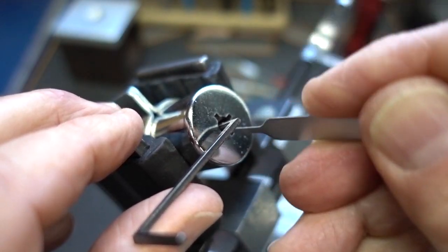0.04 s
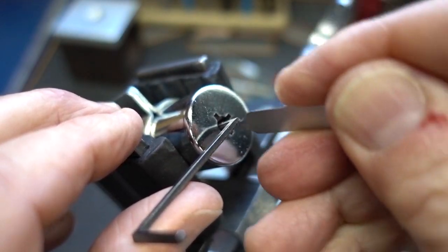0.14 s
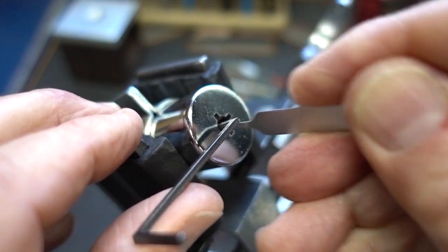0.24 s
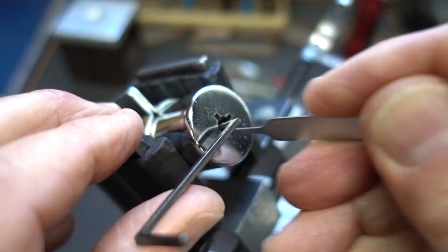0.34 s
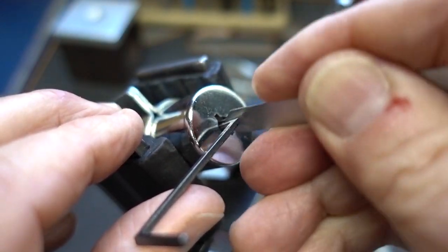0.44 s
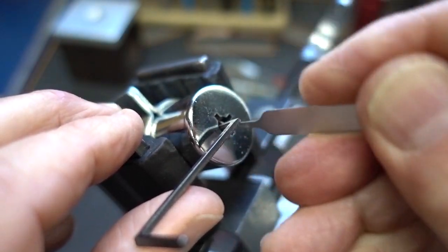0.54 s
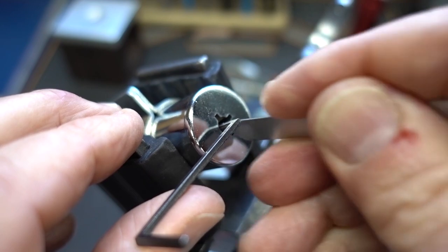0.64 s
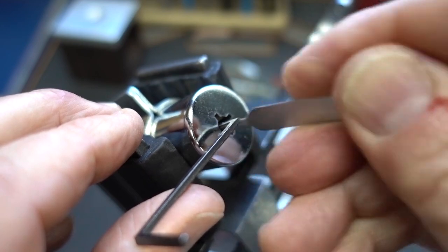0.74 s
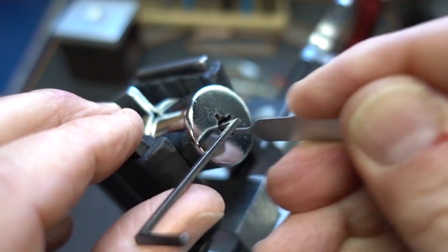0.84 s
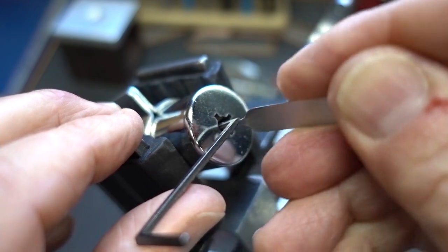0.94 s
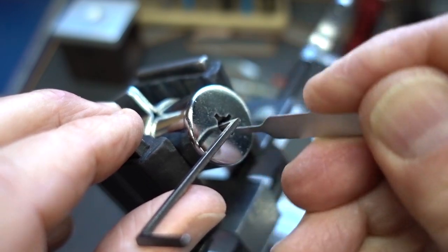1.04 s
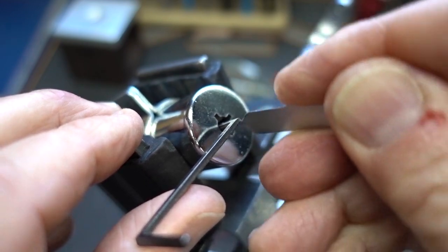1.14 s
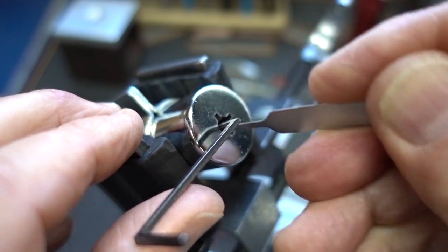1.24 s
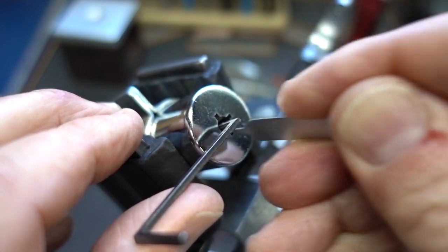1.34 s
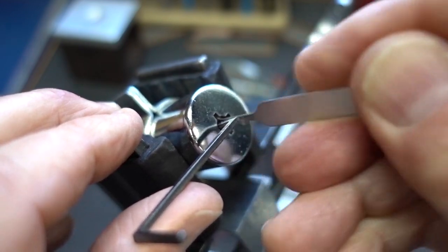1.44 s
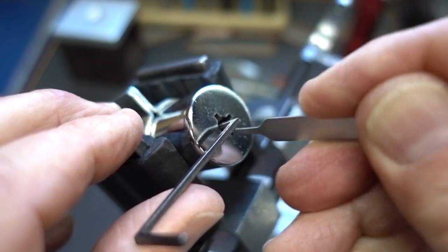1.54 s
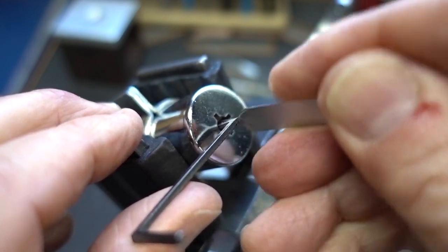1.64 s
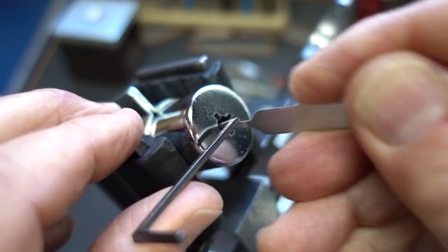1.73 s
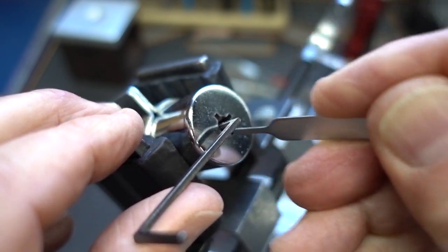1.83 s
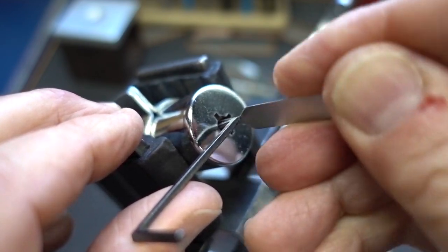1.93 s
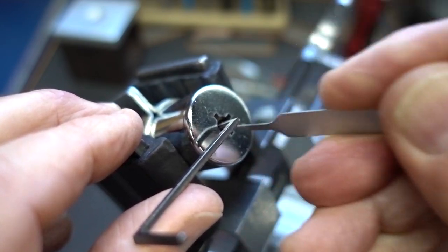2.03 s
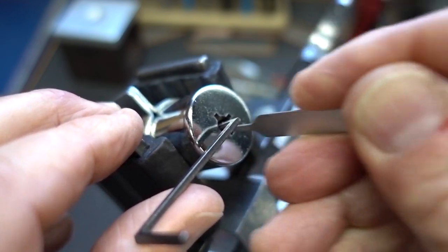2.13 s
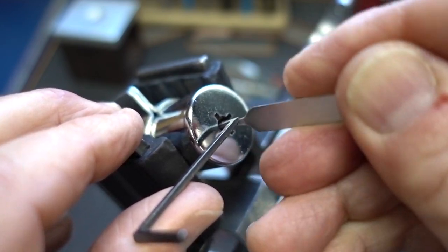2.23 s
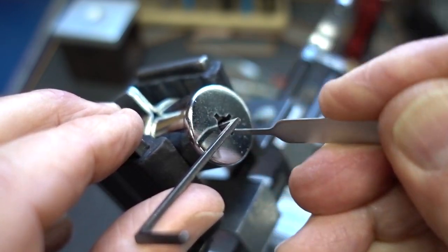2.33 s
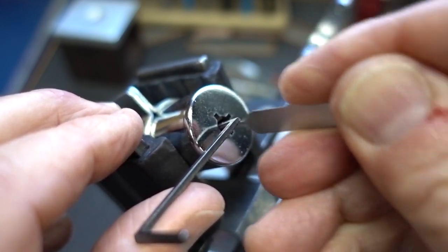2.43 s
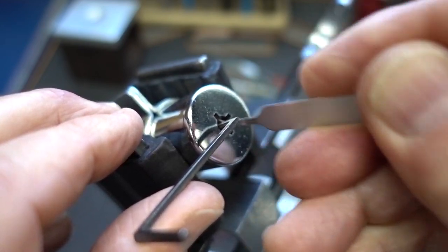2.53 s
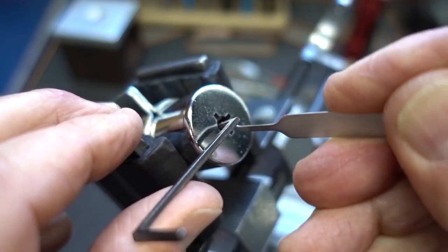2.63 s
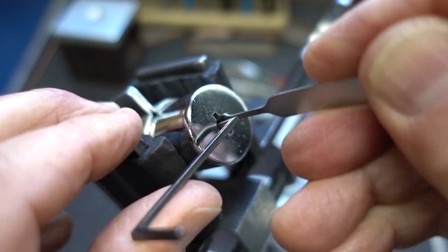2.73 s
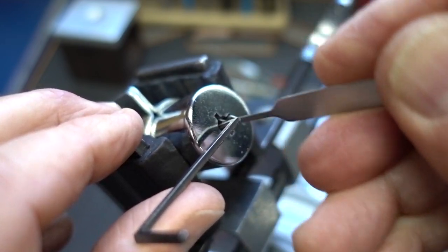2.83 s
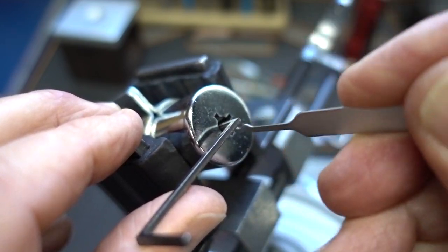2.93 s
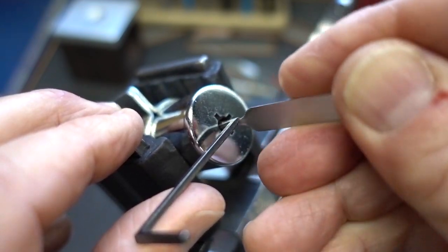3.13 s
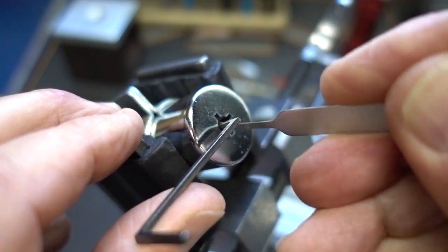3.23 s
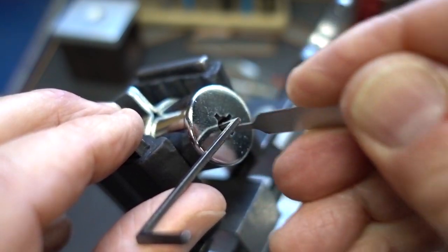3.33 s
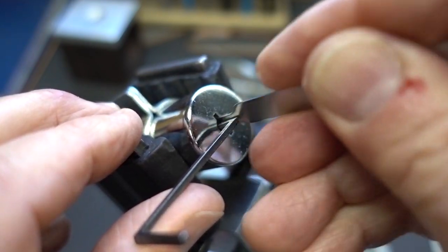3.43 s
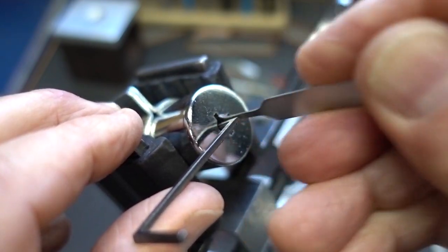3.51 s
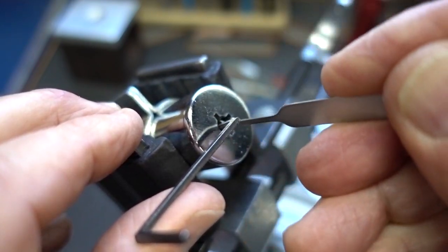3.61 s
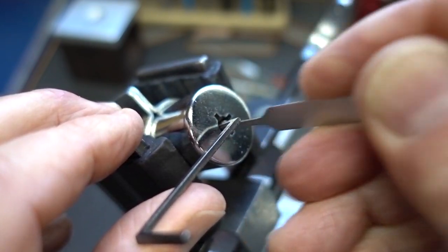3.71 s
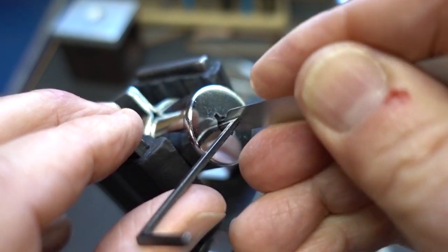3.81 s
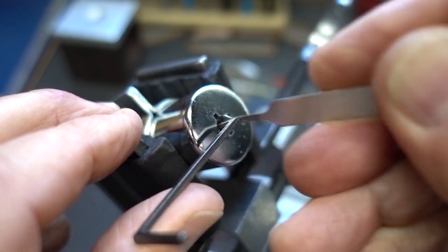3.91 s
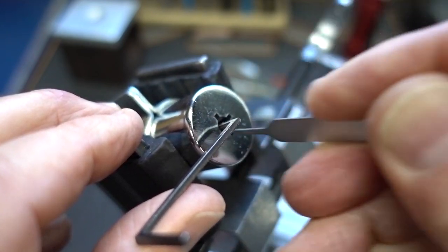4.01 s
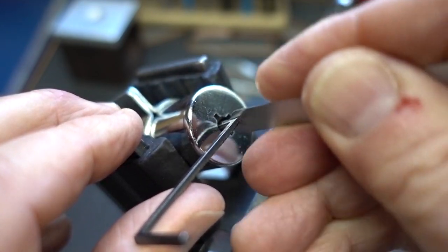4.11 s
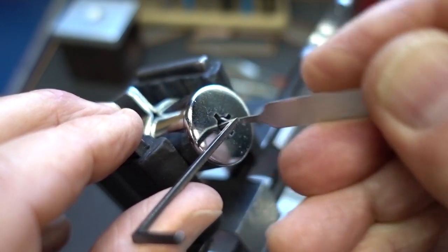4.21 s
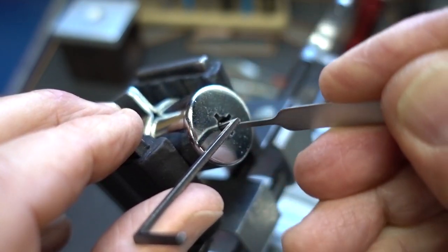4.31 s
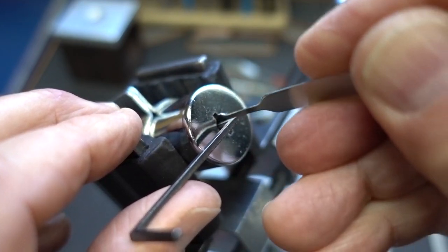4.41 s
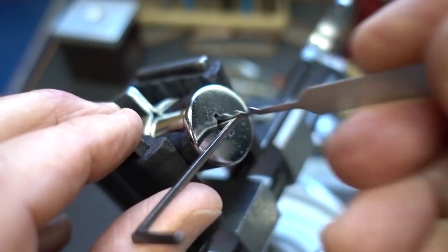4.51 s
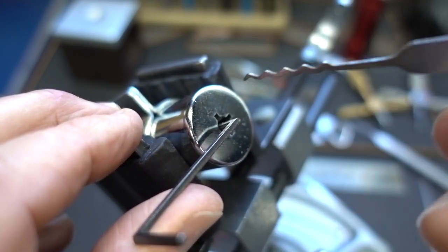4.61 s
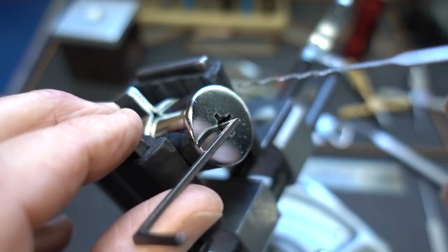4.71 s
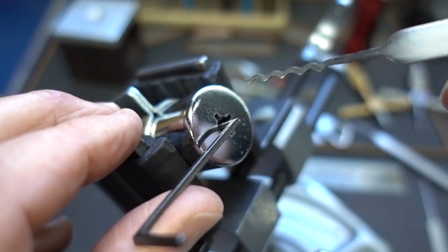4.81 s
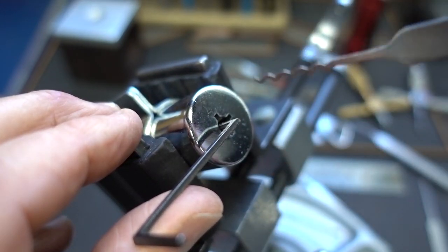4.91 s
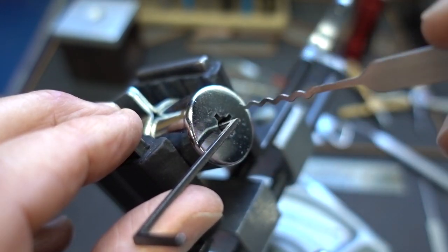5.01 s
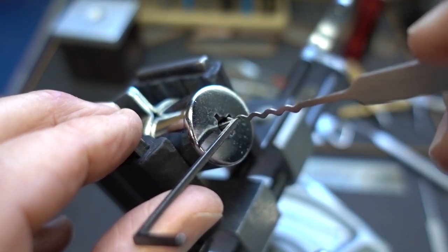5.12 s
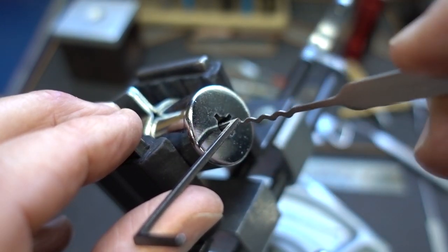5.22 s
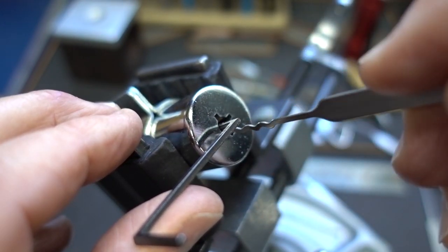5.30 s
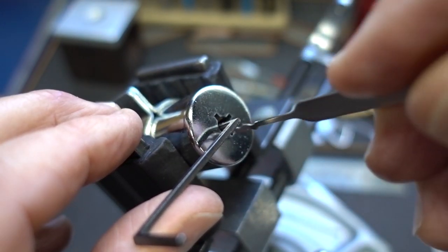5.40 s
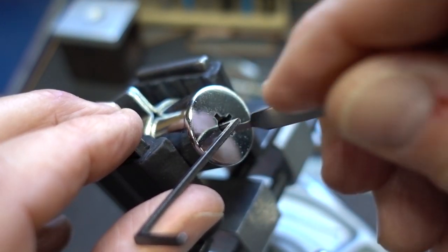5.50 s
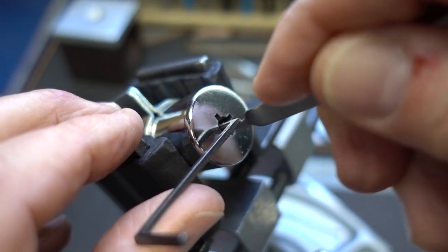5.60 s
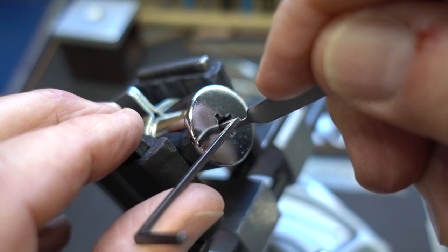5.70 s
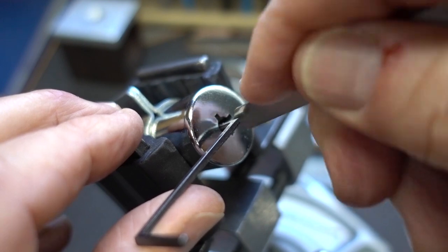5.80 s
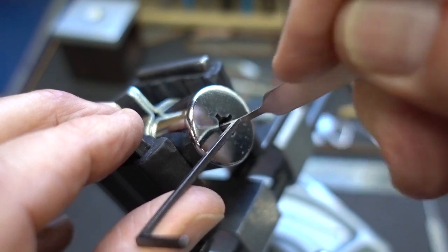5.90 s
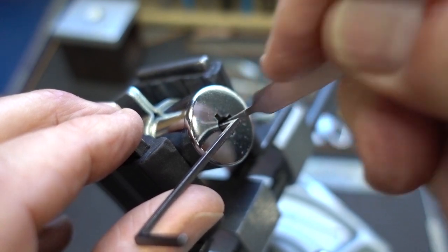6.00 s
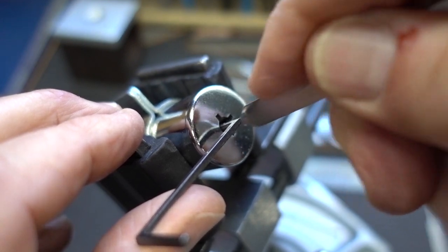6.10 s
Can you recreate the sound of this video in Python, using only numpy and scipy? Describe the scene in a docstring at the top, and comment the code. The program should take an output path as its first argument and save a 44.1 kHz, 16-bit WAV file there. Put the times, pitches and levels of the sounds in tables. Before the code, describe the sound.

A thin steel rake scrubs rapidly inside a lock, pins snapping in bright scratchy clicks, pausing briefly, then starting again in a quiet room.

```python
"""Pins snap in a lock held in a vise as a wavy steel rake is scrubbed in and out, close by in a small room.
Each snap is a sharp crack, a ping and a dying chatter that ring the steel and the lock body.
The blade scrapes in tiny slips of noise; pushes, recoils and bumps ring the lock, vise and bench.
The rake is pulled out, pauses while fingers rustle, ticks at the keyhole and starts again over a quiet room."""
import sys
import numpy as np
from scipy import signal
from scipy.fft import rfft, irfft, next_fast_len
from scipy.io import wavfile

SR = 44100
rng = np.random.default_rng(int(sys.argv[2]) if len(sys.argv) > 2 else 0)


def file_out(sig):
    """Save sig as 16-bit WAV at sys.argv[1]."""
    # one column per channel
    cols = np.atleast_2d(sig).T
    # limit, then scale
    lim = np.clip(cols, -1, 1)
    pcm = np.round(lim * 32767).astype(np.int16)
    wavfile.write(sys.argv[1], SR, pcm)


N = 271215

# pins that catch on a tooth and snap free, standing out of the rattle:
# start_s [s], level_db [dB, relative], brightness_db [dB]
PIN_SNAPS = [(0.041, -30.5, -4.5), (0.181, -32.5, -15), (0.299, -27.5, -1), (0.403, -28, 11),
             (0.419, -24, -6.5), (0.549, -17, -2.5), (0.573, -19, -3.5), (0.657, -23.5, 7.5),
             (0.778, -27, 3), (0.788, -22, 0), (0.899, -26, 5), (1.028, -18.5, 0), (1.072, -25.5, 7.5),
             (1.139, -31, -11.5), (1.255, -19.5, 7), (1.27, -26.5, -8.5), (1.322, -32.5, -6),
             (1.387, -24.5, -17), (1.453, -22, 9.5), (1.492, -18, 1), (1.583, -27, 19), (1.698, -20, 0),
             (1.828, -34.5, 0.5), (1.92, -30, 2.5), (1.965, -22, -3.5), (2.074, -28, 19), (2.236, -19, -3),
             (2.544, -19, -1), (2.579, -18, -1.5), (2.609, -19.5, -0.5), (2.906, -32.5, 10),
             (2.928, -34.5, -2), (3.065, -29.5, 1), (3.133, -29.5, -11), (3.193, -23.5, 6),
             (3.257, -22.5, -1), (3.314, -28.5, 26.5), (3.439, -28.5, 3), (3.475, -22, 2), (3.54, -21, -9),
             (3.572, -23.5, -2), (3.904, -21, -5), (3.962, -23.5, -13), (4.094, -27.5, 34),
             (4.184, -22, 8.5), (4.215, -19, -9.5), (4.28, -29, -2), (4.561, -22, 7.5), (4.567, -20, 10),
             (4.585, -18.5, -1), (5.5, -41, 5), (5.557, -25, 3), (5.769, -24, 37), (5.841, -24.5, -6),
             (5.92, -22, -6), (5.944, -23, -17)]
# short pushes and pulls of the rake across the pins:
# start_s [s], length_s [s], pin_level_db [dB, relative], lock_jolt_db [dB, relative]
RAKE_PUSHES = [(0.041, 0.034, -32, -34.5), (0.192, 0.011, -52, -44.5), (0.283, 0.045, -35, -30),
               (0.396, 0.032, -29, -43), (0.461, 0.01, -43.5, -34), (0.544, 0.036, -28.5, -39.5),
               (0.657, 0.018, -31, -29), (0.779, 0.045, -28.5, -27.5), (0.888, 0.021, -32.5, -37.5),
               (0.973, 0.012, -30.5, -29.5), (1.107, .033, -37, -37.5), (1.255, .016, -24.5, -24.5),
               (1.371, 0.023, -30, -42.5), (1.452, .018, -32, -24.5), (1.488, 0.0094, -32.5, -29),
               (1.595, 0.049, -33.5, -39.5), (1.774, 0.021, -31.5, -33.5), (1.886, 0.047, -36, -31),
               (2.036, .048, -26, -30.5), (2.162, 0.039, -28, -39), (2.309, 0.012, -26, -33),
               (2.453, 0.03, -32, -33), (2.574, .035, -36, -37.5), (2.646, 0.01, -35, -34.5),
               (2.722, 0.031, -37.5, -31), (3.033, 0.055, -28, -32.5), (3.131, 0.021, -34, -34.5),
               (3.2, 0.029, -29, -28.5), (3.252, 0.0088, -30, -39), (3.381, 0.044, -45.5, -68.5),
               (3.475, 0.012, -30, -30.5), (3.518, .028, -32.5, -28), (3.562, 0.023, -28, -33),
               (3.743, 0.041, -35.5, -36), (3.813, 0.0082, -41, -49), (3.908, .032, -25.5, -23.5),
               (3.96, 0.015, -28, -35), (4.041, 0.068, -36, -37.5), (4.183, 0.035, -38, -28),
               (4.278, 0.02, -33.5, -38), (4.416, 0.0088, -35, -36.5), (4.496, .022, -39, -37),
               (4.534, .062, -25, -31.5), (5.358, 0.0054, -60, -47), (5.527, 0.045, -32.5, -36),
               (5.647, .023, -31, -35.5), (5.81, 0.029, -34, -40), (5.896, 0.059, -29, -36.5),
               (6.043, 0.055, -26, -28.5)]
PIN_BRIGHT_DB, BRIGHT_SCATTER_DB = 0.5, 10.5  # mean brightness of passing and loose pins, and its spread


def amp(db):
    """Turn decibels into a gain."""
    return 10 ** (np.asarray(db) / 20)


def unit(x):
    """Scale a sound to rms 1."""
    return x / np.sqrt(np.mean(x ** 2) + 1e-20)


def along(points, hz):
    """Read a curve of (Hz, value) points on a logarithmic frequency axis."""
    f, value = np.transpose(points)
    return np.interp(np.log(hz + 1), np.log(f), value)


def levels(rows):
    """Turn each dB column after the time into one gain per sample."""
    s, *columns = np.transpose(rows)
    return [amp(np.interp(np.arange(N) / SR, s, db)) for db in columns]


def add(track, s, sound):
    """Mix a sound into a track at time s."""
    start = max(round(s * SR), 0)
    track[start:start + len(sound)] += sound[:max(len(track) - start, 0)]


def filtered(x, response):
    """Multiply the spectrum of x by a response that depends on frequency."""
    size = next_fast_len(N + SR // 2)  # room for the ringing at the end
    return irfft(rfft(x, size) * response(np.fft.rfftfreq(size, 1 / SR)), size)[:N]


def coloured(x, spectrum, size=4096):
    """Give x a spectrum with a filter of unit energy that never rings ahead of the sound."""
    # folding the cepstrum forward in time gives the filter its minimum phase
    cepstrum = irfft(np.log(amp(along(spectrum, np.fft.rfftfreq(size, 1 / SR)))))
    cepstrum[1:size // 2] *= 2
    cepstrum[size // 2 + 1:] = 0
    response = irfft(np.exp(rfft(cepstrum)))
    return signal.fftconvolve(x, response / np.linalg.norm(response))[:N]


def resonances(x, peaks):
    """Let a body with (Hz, width Hz, dB) resonances answer a contact force."""
    def response(f):
        return sum(amp(db) * 1j * f * width / (centre ** 2 - f ** 2 + 1j * f * width)
                   for centre, width, db in peaks)
    return filtered(x, response)


def ring(modes, attack, detune, scatter_db, size=SR // 4):
    """Sum dying tones to a peak of 1; grip and point of contact change them from blow to blow."""
    t = np.arange(size) / SR
    hz, db, t60 = np.transpose(modes)[:, :, None]
    shift, gain, phase = rng.standard_normal((3, len(modes), 1))
    tones = np.sin(2 * np.pi * hz * np.exp(detune * shift) * t + 2 * np.pi * phase)
    waves = amp(db + scatter_db * gain - 60 * t / t60) * tones
    sound = waves.sum(axis=0) * (1 - np.exp(-(t / attack) ** 2))
    return sound / np.abs(sound).max()


def slips(rate, spread_db, life):
    """Stick-slip friction of rms 1: tiny dying noise bursts at random moments and of random sizes."""
    happens = rng.random(N) < rate / SR  # rate in slips per second
    sizes = amp(spread_db * np.clip(rng.standard_normal(N), -2, 2)) * happens
    power = signal.lfilter([1], [1, -np.exp(-2 / (life * SR))], sizes ** 2)
    return unit(np.sqrt(power) * rng.standard_normal(N))


def pressure(events, build, fade, lead):
    """A force that builds up to each event (s, dB, ...), by the power share lead, and fades after it."""
    load = np.zeros(N)
    for s, db, *_ in events:
        add(load, s, [amp(db) ** 2])
    after = signal.lfilter([1], [1, -np.exp(-2 / (fade * SR))], load)
    before = signal.lfilter([1], [1, -np.exp(-2 / (build * SR))], load[::-1])[::-1]
    return np.sqrt(after + lead * before)


def snaps(contacts, crack_t60=0.01, chatter_db=-17, chatter_t60=0.082, size=SR // 12):
    """Each snap is a sharp impact, a brief ping and a dying chatter; gives forces on blade and housing."""
    # ringing of the brass pins: pitch_hz [Hz], level_db [dB, relative], decay_t60_s [s]
    pin_modes = [(5910, 7.5, 0.0043), (6650, 8.5, 0.016), (7110, 5.5, 0.0067), (9140, 2, 0.0027),
                 (9720, -5.5, 0.042), (10880, 10, 0.0069), (11560, 3.5, 0.025), (12870, -15.5, 0.015),
                 (13900, 6.5, 0.0074)]
    blade, housing, t = np.zeros(N), np.zeros(N), np.arange(size) / SR
    soft = signal.firwin(15, 9000, fs=SR)
    for s, db, bright_db in contacts:
        length, impact, seat_db = rng.uniform(-1, 1, 3) * [0.5, 0.3, 2]
        crack = amp(-60 * t / (crack_t60 * np.exp(length))) * rng.standard_normal(size)
        crack[0] += 0.48 * np.exp(impact)
        chatter = amp(chatter_db - 60 * t / chatter_t60) * rng.standard_normal(size)
        blow = crack + chatter
        add(blow, 0, 1.3 * ring(pin_modes, attack=0.0001, detune=0.035, scatter_db=4, size=SR // 36))
        blow *= amp(db) / np.std(blow[:SR // 333])  # level is set by the first 3 ms
        # square contacts are brighter, glancing ones duller
        low = np.convolve(blow, soft)
        high = np.pad(blow, len(soft) // 2) - low
        tilt = amp(bright_db)
        add(blade, s, (low + tilt * high) / np.sqrt(0.7 + 0.3 * tilt ** 2))
        # a pin that is firmly seated passes more of the blow to the housing
        add(housing, s, amp(seat_db) * blow)
    return blade, housing


def rattle():
    """During a push the teeth trip one pin after another, unevenly; rows (s, level dB, brightness dB)."""
    tooth_s = 0.0105  # usual time from one pin to the next
    gap_scatter, strength_scatter_db = 0.22, 2.5  # unevenness of spacing (share of a gap) and strength
    rows = []
    for start, length, db, _ in RAKE_PUSHES:
        count = round(length / tooth_s) + 1
        shift, strength, square = np.clip(rng.standard_normal((3, count)), -1.5, 1.5)
        shift[0] = 0  # the first pin trips as the push starts
        times = np.linspace(start, start + length, count) + gap_scatter * tooth_s * shift
        bright_db = PIN_BRIGHT_DB + BRIGHT_SCATTER_DB * square
        rows += zip(times, db + strength_scatter_db * strength, bright_db)
    return rows


def strays(sliding, count=32):
    """Loose pins tick at random, as loud as the sliding allows; rows (s, level dB, brightness dB)."""
    above_scrape_db, spread_db = 4.5, 4
    when = rng.integers(0, N, count)
    strength, square = rng.standard_normal((2, count))
    db = 20 * np.log10(sliding[when]) + above_scrape_db + spread_db * np.clip(strength, -2, 2)
    return list(zip(when / SR, db, PIN_BRIGHT_DB + BRIGHT_SCATTER_DB * square))


def steel(x):
    """Pins and blade give a contact force their bright ring."""
    # spectrum of the ring: pitch_hz [Hz], level_db [dB per Hz, relative]
    steel_spectrum = [(2500, -33.5), (4600, -44.5), (5300, -10), (6000, -2), (6700, 2.5), (7300, 3.5),
                      (8100, -1), (9400, -1.5), (11500, -4.5), (12500, -6.5), (15300, -6.5), (16000, -13)]
    return coloured(x, steel_spectrum)


def cylinder(x):
    """The lock body and tension wrench ring with a contact force."""
    # their resonances: pitch_hz [Hz], width_hz [Hz], level_db [dB, relative]
    body_peaks = [(414, 29.3, 6.5), (794, 26, -15.5), (1001, 264, -12), (1388, 9.5, -10.5),
                  (1343, 115, -10.5), (1610, 213, -13), (1798, 48.5, 3), (2113, 150, -16), (2386, 250, -28),
                  (2922, 610, -13), (3377, 100, -9), (3766, 23, -8.5)]
    return resonances(x, body_peaks)


def hand_force(lead):
    """The force of the hand swells with each push, ahead of it by the share lead, and relaxes after it."""
    middles = [(start + length / 2, jolt_db) for start, length, _, jolt_db in RAKE_PUSHES]
    return pressure(middles, build=0.058, fade=0.18, lead=lead)


def stroke():
    """Sliding and hand force set the gains of sliding alone, of the whole scrape and of the clamp's rumble."""
    # the blade in the keyway, withdrawn for the pause:
    # start_s [s], scrape_db [dB, relative], clamp_rumble_db [dB, relative]
    stroke_levels = [(0, -47.5, -53.5), (0.75, -41, -41), (1.2, -41.5, -50), (2.1, -42.5, -43.5),
                     (2.9, -48, -51.5), (3.7, -47, -55), (4.05, -37, -51.5), (4.57, -48.5, -43.5),
                     (4.66, -84, -62), (5.05, -90, -88.5), (5.24, -91.5, -87), (5.28, -66, -53),
                     (5.42, -67.5, -59), (5.6, -51.5, -49.5), (6.15, -38, -44.5)]
    engaged_db = -56  # scrape level above which the blade is fully in the lock
    hand_scrape_db, hand_rumble_db = -24.5, -19  # gains from hand force to scrape and to rumble
    sliding, rumble = levels(stroke_levels)
    engaged = np.minimum(sliding / amp(engaged_db), 1)
    # the clamp is loaded ahead of a push, but the blade scrapes only once it moves
    rumble = np.hypot(rumble, amp(hand_rumble_db) * engaged * hand_force(lead=0.5))
    scrape = np.hypot(sliding, amp(hand_scrape_db) * engaged * hand_force(lead=0))
    return sliding, scrape, rumble


def blade_friction(contacts, scrape):
    """The blade loads each pin just before it snaps, rubs on it after, and scrapes along the keyway."""
    drag = pressure(contacts, build=0.0031, fade=0.0063, lead=0.025)
    pin_rub = amp(-6) * drag * slips(rate=490, spread_db=2.5, life=0.0017)
    return pin_rub + amp(-11.5) * scrape * slips(rate=600, spread_db=14, life=0.0055)


def rocking():
    """Pushes rock the lock in its clamp and snaps make it recoil; rows (s, knock dB, thud dB)."""
    rock_s, rock_lag = 0.03, 0.3  # one rock per this much of a push, this share of the way into each part
    push_knock_db, push_thud_db, thud_growth = -3, -6, 0.93  # growth: dB of thud per dB of jolt
    recoil_knock_db, recoil_thud_db = -13, -15.5
    recoil_per_bright = -0.079  # dB per dB of brightness: bright snaps recoil less
    rows = []
    for start, length, _, jolt_db in RAKE_PUSHES:
        count = max(round(length / rock_s), 1)
        db = jolt_db - 10 * np.log10(count)  # the rocks share the power of the jolt
        for k in range(count):
            s = start + length * (k + rock_lag) / count
            rows.append((s, db + push_knock_db, thud_growth * db + push_thud_db))
    for s, db, bright_db in PIN_SNAPS:
        recoil_db = db + recoil_per_bright * bright_db
        rows.append((s, recoil_db + recoil_knock_db, recoil_db + recoil_thud_db))
    return rows


def jolts(rocks, grind_t60=0.069, grind_growth=1.13, size=SR // 8):
    """A jolt rocks the lock, thuds through the vise and grinds the plug, proportionally more when hard."""
    # the lock rocking in the jaws: pitch_hz [Hz], level_db [dB, relative], decay_t60_s [s]
    knock_modes = [(319.7, -3.5, 0.067), (412.7, 8.5, 0.057), (443, -10, 0.065)]
    # the vise and bench: pitch_hz [Hz], level_db [dB, relative], decay_t60_s [s]
    vise_modes = [(64, -5.5, 0.12), (81.8, -16, 0.63), (84.3, -2, 0.15), (126.4, 4.5, 0.094),
                  (172, -4.5, 0.088), (241.7, 1.5, 0.042)]
    body, grind, t = np.zeros(N), np.zeros(N), np.arange(size) / SR
    for s, knock_db, thud_db in rocks:
        knock = ring(knock_modes, attack=0.0074, detune=0.03, scatter_db=1.5, size=size)
        thud = ring(vise_modes, attack=0.0039, detune=0.026, scatter_db=3.5)
        add(body, s, amp(knock_db + 3.5) * knock)
        add(body, s, amp(thud_db + 3) * thud)
        add(grind, s, amp(grind_growth * knock_db - 60 * t / grind_t60) * rng.standard_normal(size))
    return body + amp(13.5) * cylinder(grind)


def bumps(bump_t60=0.063, size=SR // 8):
    """At the end of its travel the rake bumps the lock: a dull blow of noise, and the bench sways briefly."""
    # bumps against the jaws: start_s [s], bump_db [dB, relative], bench_sway_db [dB, relative]
    bump_rows = [(0.546, -26, -28.5), (0.81, -39, -32), (1.261, -26, -40), (1.463, -35.5, -33),
                 (1.501, -32.5, -26), (2.24, -38, -42), (2.585, -36.5, -31), (2.609, -28, -33.5),
                 (3.26, -37.5, -31), (3.476, -26.5, -37.5), (3.571, -29, -26), (3.865, -37, -34),
                 (3.96, -41, -29), (4.218, -26.5, -28), (4.423, -30.5, -39.5)]
    # dull spectrum of the jaws: pitch_hz [Hz], level_db [dB per Hz, relative]
    jaw_spectrum = [(40, -28.5), (120, -7), (200, -3.5), (290, -1.5), (400, -4), (520, -20.5), (750, -61),
                    (2000, -79)]
    # the bench swaying: pitch_hz [Hz], level_db [dB, relative], decay_t60_s [s]
    bench_modes = [(47, 0, 0.29)]
    force, sway, t = np.zeros(N), np.zeros(N), np.arange(size) / SR
    for s, db, sway_db in bump_rows:
        add(force, s, amp(db + 1.5 - 60 * t / bump_t60) * rng.standard_normal(size))
        add(sway, s, amp(sway_db - 4) * ring(bench_modes, attack=0.006, detune=0.07, scatter_db=0))
    return coloured(force, jaw_spectrum) + sway


def clamp_creak(rumble):
    """The loaded clamp rumbles in low-pitched slips."""
    # spectrum of the rumble: pitch_hz [Hz], level_db [dB per Hz, relative]
    rumble_spectrum = [(15, -56), (25, -36.5), (41, -1), (70, -1), (130, 3.5), (167, -3.5), (267, -4.5),
                       (358, -11.5), (406, 3.5), (448, 6), (501, -19), (545, -15), (635, -31), (700, -77),
                       (910, -30.5), (1540, -120)]
    creaks = coloured(slips(rate=150, spread_db=1.5, life=0.0019), rumble_spectrum)
    return amp(-0.5) * rumble * unit(creaks)


def taps(tick_t60=0.005, scuff_db=-15, scuff_t60=0.06, ping_db=-15, size=SR // 10):
    """Outside the lock the thin blade ticks, scuffs briefly and barely rings."""
    # the free blade touching the mouth of the keyway: start_s [s], level_db [dB, relative]
    tap_rows = [(5.164, -43), (5.219, -56.5), (5.2535, -43.5), (5.295, -53), (5.304, -40), (5.31, -47),
                (5.3806, -51), (5.455, -50.5)]
    # the blade held free: pitch_hz [Hz], level_db [dB, relative], decay_t60_s [s]
    blade_modes = [(2650, -17, 0.04), (4370, -22.5, 0.04), (5230, -18, 0.019), (6570, 3, 0.031),
                   (7230, 2, 0.019), (8570, 9, 0.015), (10300, 21, 0.039), (12000, -5, 0.02),
                   (15150, -5, .01)]
    out, t = np.zeros(N), np.arange(size) / SR
    thin = signal.butter(4, 4000, "high", fs=SR, output="sos")
    for s, db in tap_rows:
        envelope = amp(-60 * t / tick_t60) + amp(scuff_db - 60 * t / scuff_t60)
        tick = signal.sosfilt(thin, envelope * rng.standard_normal(size))
        ping = amp(ping_db) * ring(blade_modes, attack=0.0001, detune=0.03, scatter_db=3, size=size)
        add(out, s, amp(db + 9) * (tick + ping))
    return out


def entry():
    """The tip rubs softly along the keyway as it goes back in."""
    # the tip held against the keyway wall: pitch_hz [Hz], width_hz [Hz], level_db [dB, relative]
    keyway_peaks = [(1143, 40, 5), (1344, 61, 5), (1580, 50, -0.5), (2090, 67, 3), (2840, 140, 2.5),
                    (3300, 130, -4), (4200, 160, 2)]
    start_s, attack_s, hold_s = 5.255, 0.023, 0.045  # hold counts from the start
    level_db, fade_db_per_s = -69, 74
    t = np.arange(N) / SR - start_s
    fade = amp(level_db - fade_db_per_s * np.maximum(t - hold_s, 0))
    envelope = np.clip(t / attack_s, 0, 1) * fade
    rub = slips(rate=1900, spread_db=4, life=0.0023)
    # passing the resonances twice makes them sharper
    return envelope * unit(resonances(resonances(rub, keyway_peaks), keyway_peaks))


def grip():
    """Fingers shift on the steel handle during the pause: skin rustles and the vise thrums."""
    # strength of the shifting: start_s [s], level_db [dB, relative]
    grip_levels = [(4.58, -92), (4.65, -56), (4.71, -60), (4.78, -62), (4.83, -59), (4.9, -64.5),
                   (5.03, -74), (5.2, -100)]
    # skin on the handle: pitch_hz [Hz], level_db [dB per Hz, relative]
    skin_spectrum = [(300, 6), (700, -12), (1400, 2.5), (2700, 0), (4500, -11), (6700, 3), (9000, 2.5),
                     (13000, -0.5), (16000, -4.5)]
    # the vise stirred by the hand: pitch_hz [Hz], level_db [dB per Hz, relative]
    thrum_spectrum = [(25, -28.5), (55, -11), (80, 0), (105, -9), (160, -26.5), (400, -29.5), (600, -71.5)]
    rustle = unit(coloured(slips(rate=6800, spread_db=7.5, life=0.002), skin_spectrum))
    thrum = unit(coloured(rng.standard_normal(N), thrum_spectrum))
    return levels(grip_levels)[0] * (amp(-2) * rustle + amp(2) * thrum)


def room(x):
    """A diffuse tail of noise, 5 ms late; each frequency dies at its own speed."""
    # decay of the small room: pitch_hz [Hz], decay_t60_s [s]
    room_decay = [(100, 0.49), (450, 0.4), (1400, 0.71), (4000, 0.15), (9000, 0.079), (16000, 0.21)]
    hz, t, z = signal.stft(rng.standard_normal(SR // 2), SR, nperseg=256)
    tail = signal.istft(z * amp(-60 * t / along(room_decay, hz)[:, None]), SR, nperseg=256)[1]
    return signal.fftconvolve(x, np.pad(tail / np.linalg.norm(tail), (SR // 200, 0)))[:N]


def quiet_air():
    """The quiet room is a steady, faint coloured noise."""
    # spectrum of the quiet room: pitch_hz [Hz], level_db [dB per Hz, relative]
    air_spectrum = [(15, -58.5), (25, -12), (76, -0.5), (137, -26.5), (427, -9), (545, -60), (1840, -38),
                    (4740, -32.5), (6920, -23), (16000, -38)]
    return amp(-74) * unit(coloured(rng.standard_normal(N), air_spectrum))


def scene():
    """Snaps and friction drive the same steel and the same lock body."""
    sliding, scrape, rumble = stroke()
    contacts = PIN_SNAPS + strays(sliding) + rattle()
    on_blade, on_housing = snaps(contacts)
    friction = blade_friction(contacts, scrape)
    close = steel(amp(-1.5) * on_blade + friction)
    close += cylinder(amp(5.5) * on_housing + amp(13.5) * friction)
    close += jolts(rocking()) + bumps() + clamp_creak(rumble)
    close += taps() + entry() + grip()
    return (close + amp(-29.5) * room(close) + quiet_air())[None]


def record(dry):
    """The sound is coloured overall, with a narrow dip in the treble, and a steep filter cuts the highest
    treble."""
    # overall colour of the sound, the deep bass falling away, with a narrow dip in the treble: pitch_hz [Hz],
    # level_db [dB]
    overall_colour = [(20, -27.5), (35, -16), (55, 2), (4350, -1.5), (4620, -15.5), (4900, -0.5)]
    top_hz = 15950
    sound = filtered(dry[0], lambda hz: amp(along(overall_colour, hz)))
    return filtered(sound, lambda hz: 1 / np.sqrt(1 + (hz / top_hz) ** 160))[None]


dry = scene()
out = record(dry)
file_out(out)
```